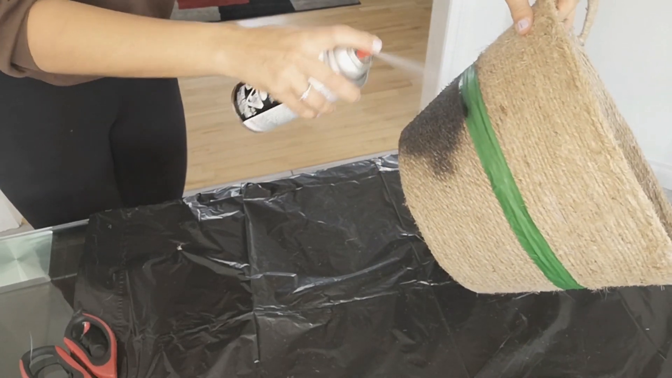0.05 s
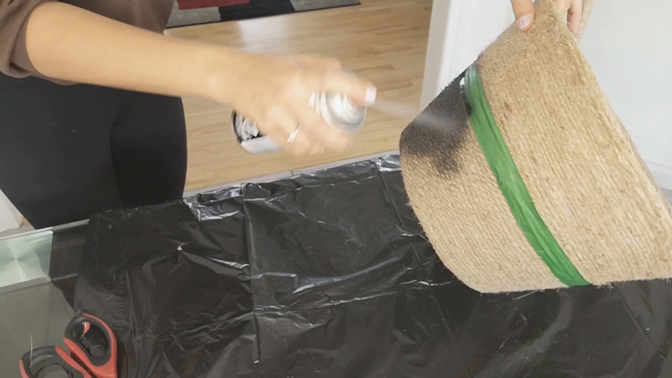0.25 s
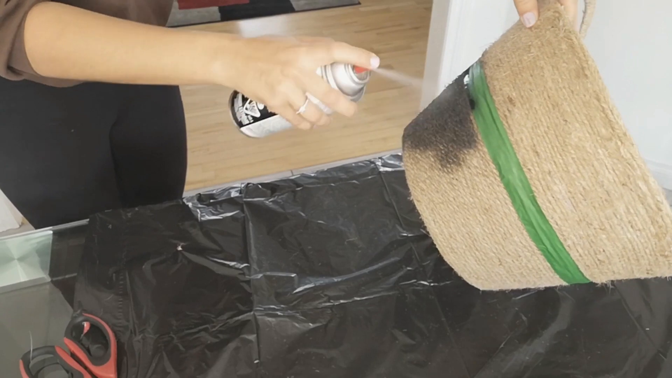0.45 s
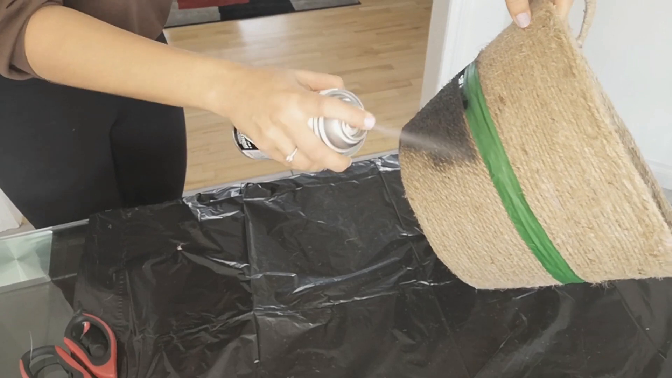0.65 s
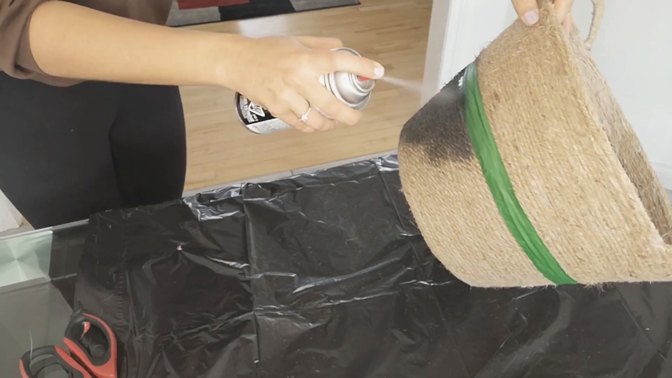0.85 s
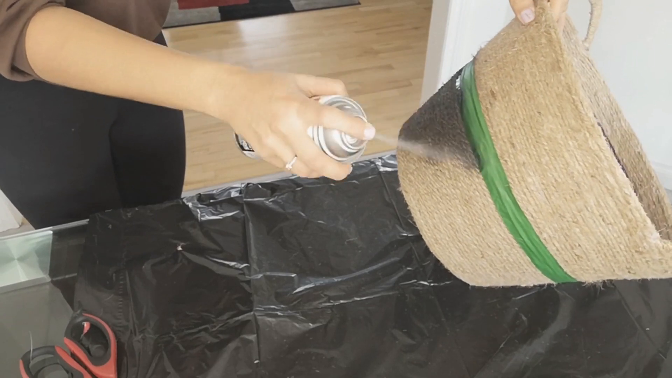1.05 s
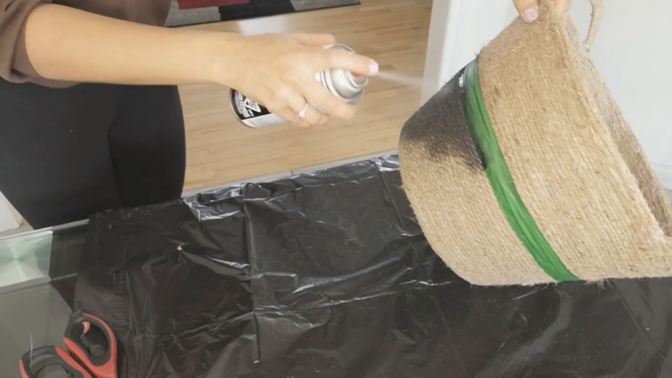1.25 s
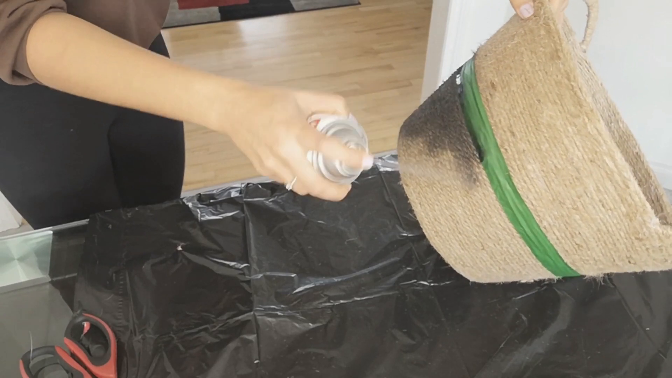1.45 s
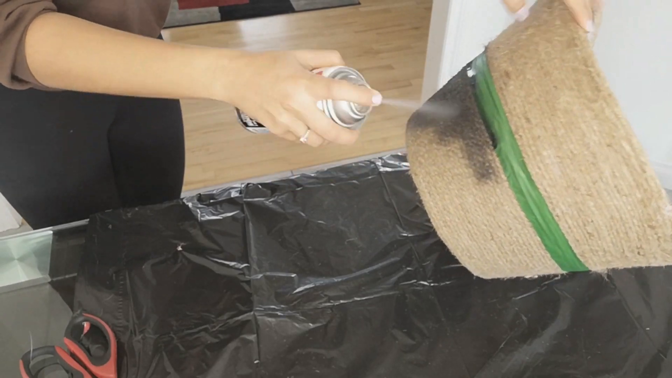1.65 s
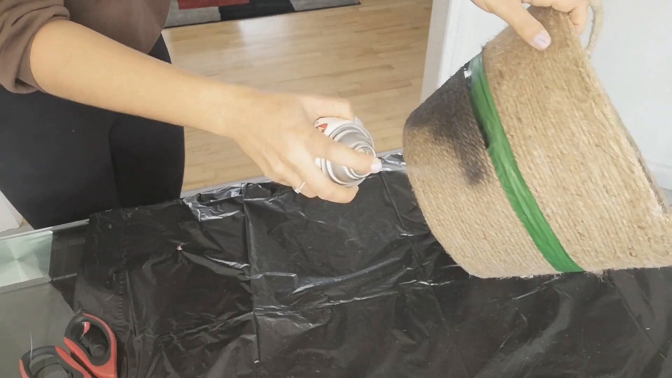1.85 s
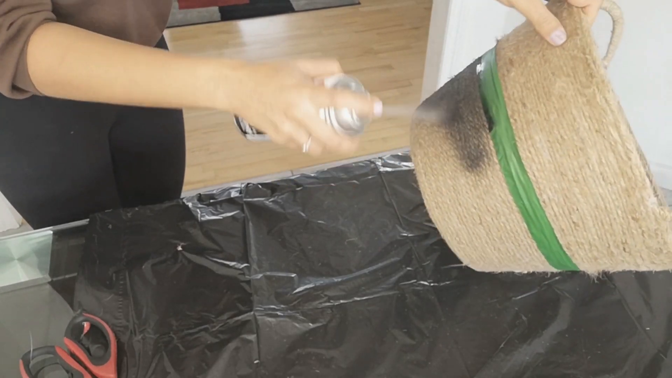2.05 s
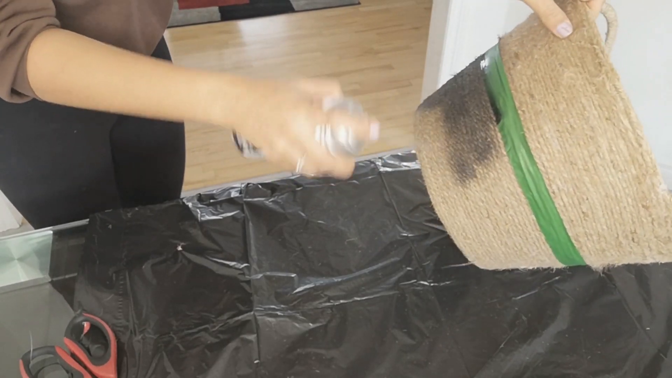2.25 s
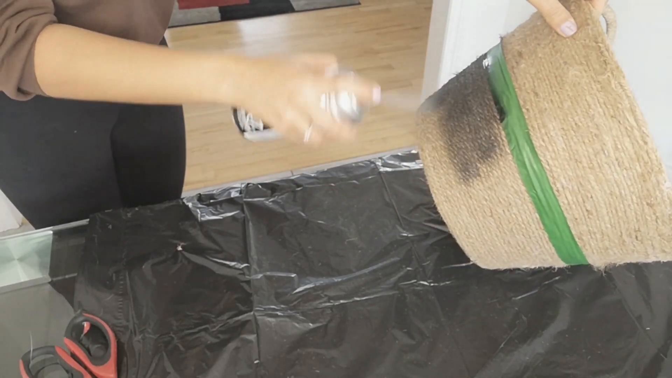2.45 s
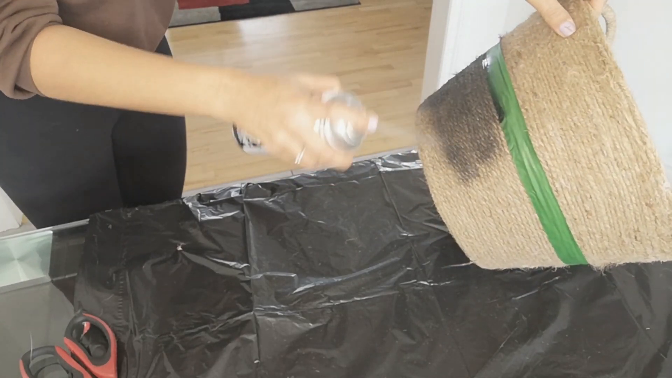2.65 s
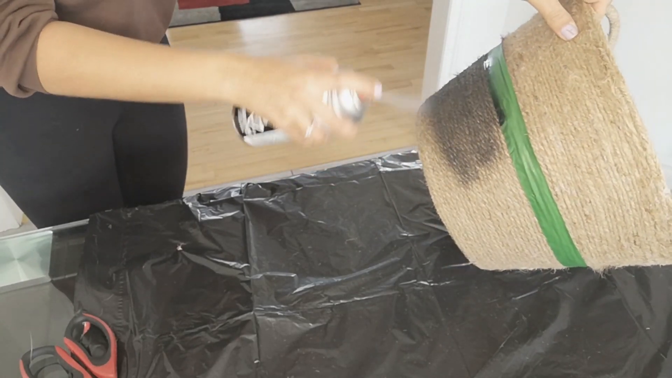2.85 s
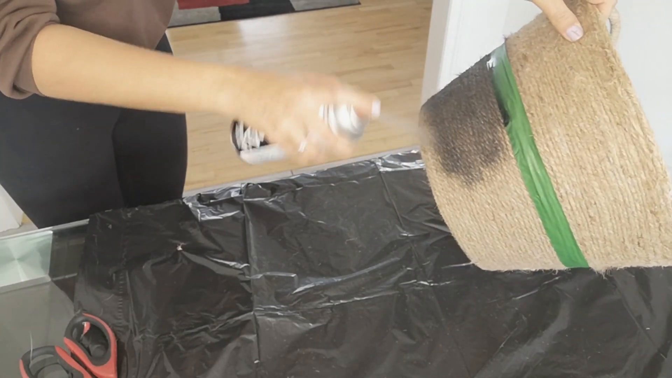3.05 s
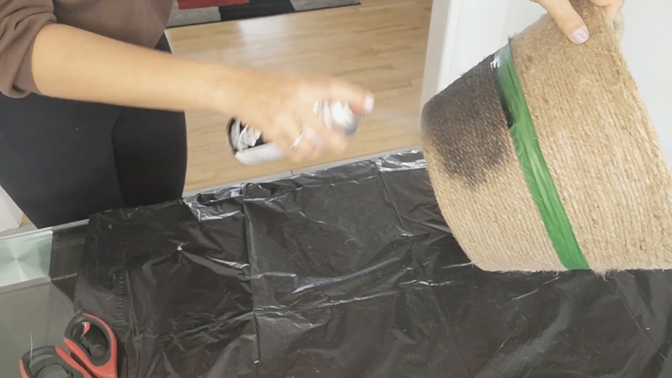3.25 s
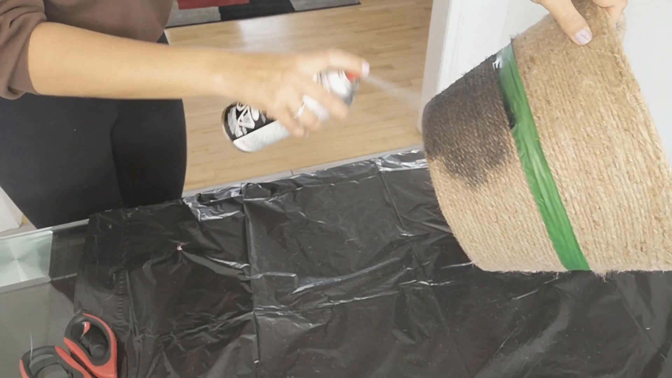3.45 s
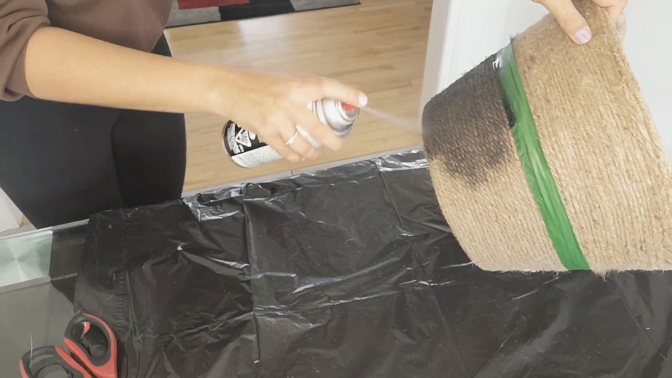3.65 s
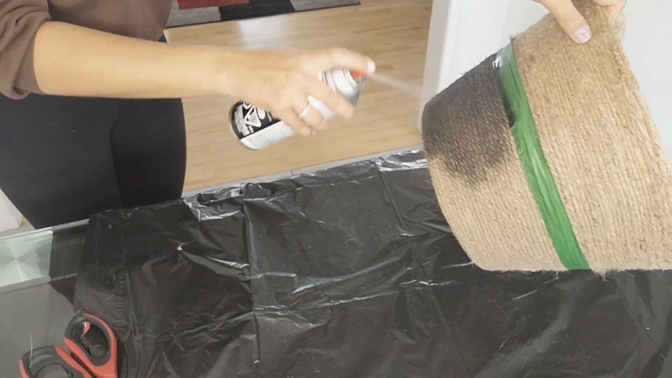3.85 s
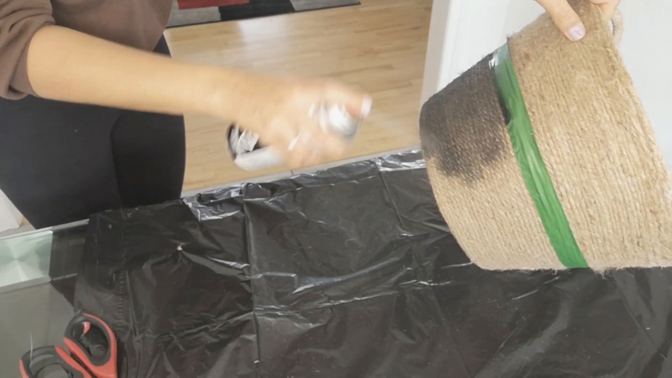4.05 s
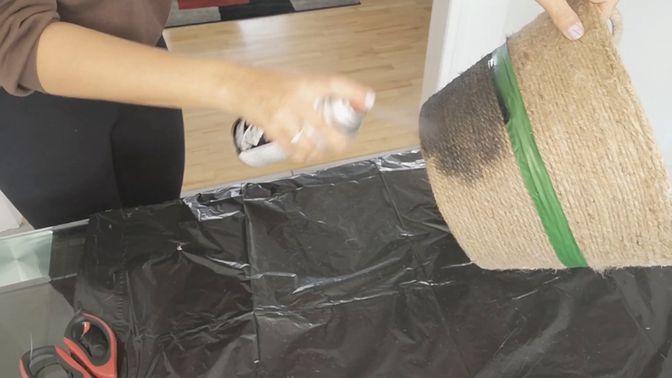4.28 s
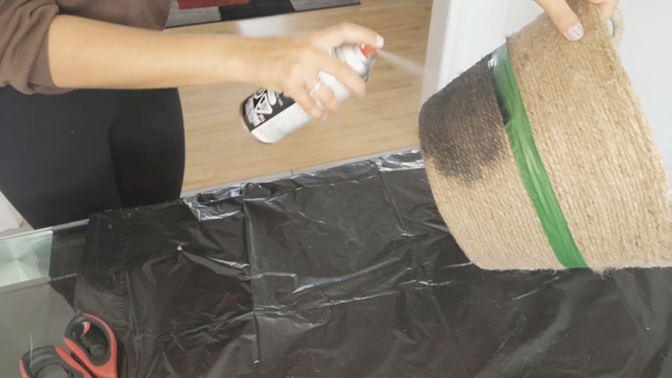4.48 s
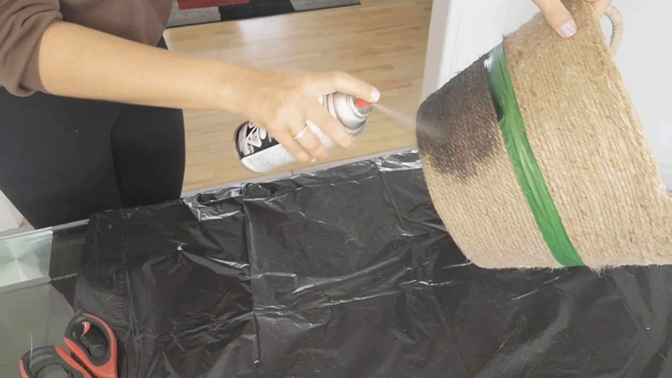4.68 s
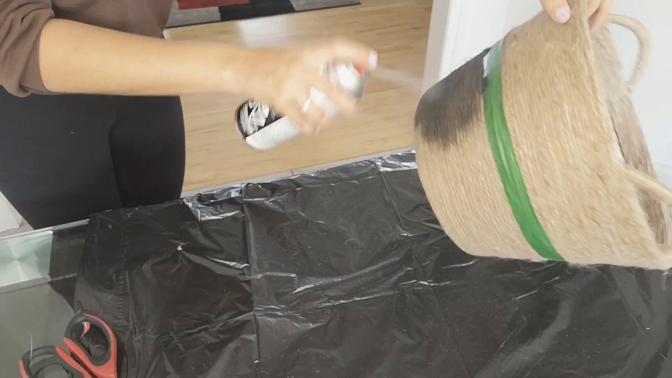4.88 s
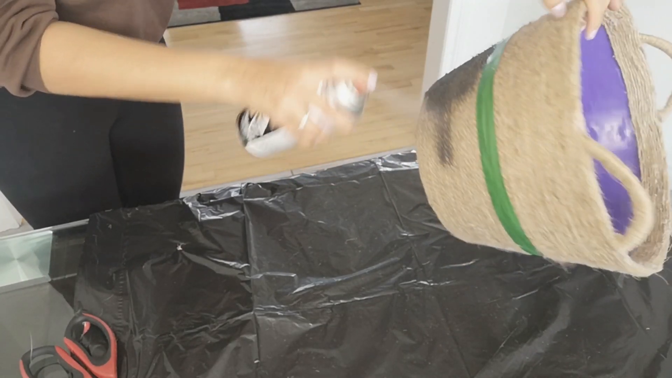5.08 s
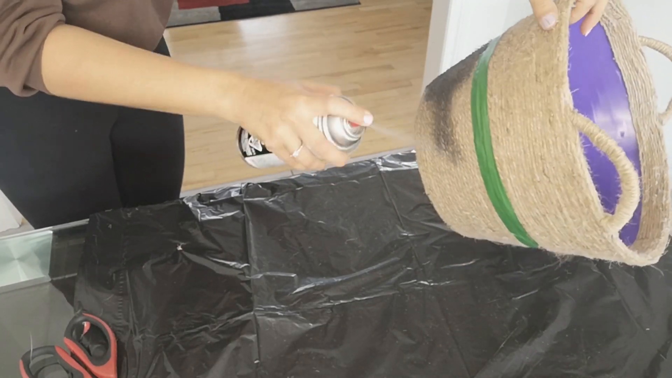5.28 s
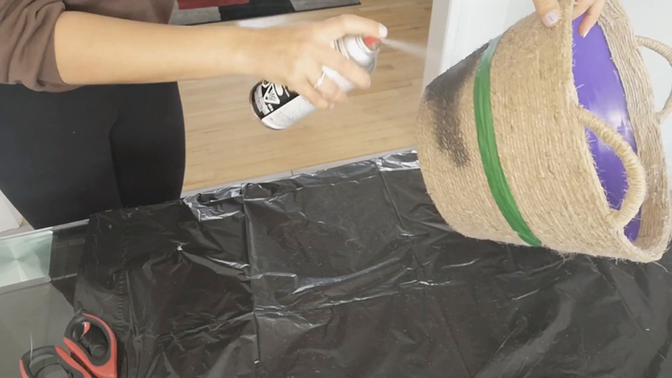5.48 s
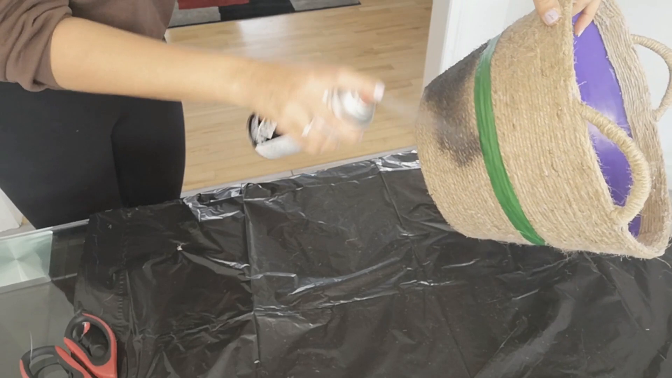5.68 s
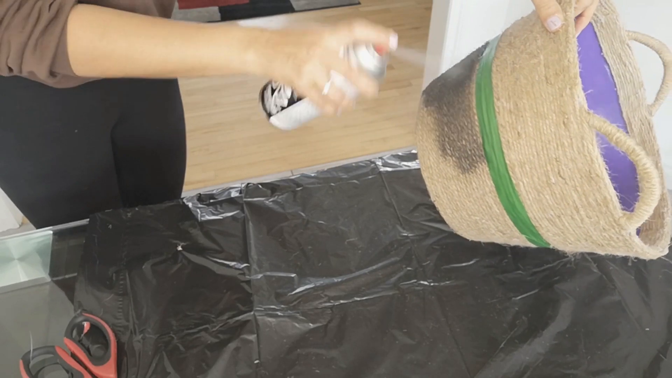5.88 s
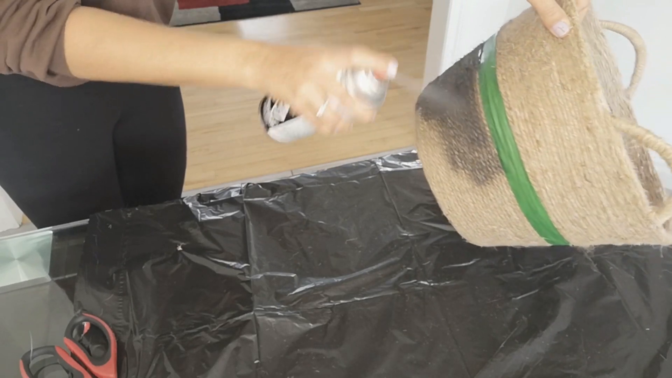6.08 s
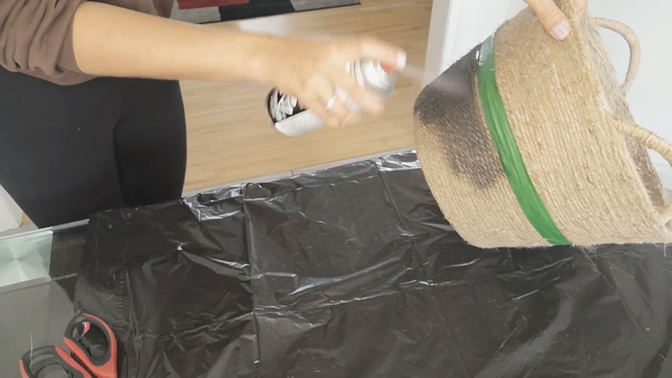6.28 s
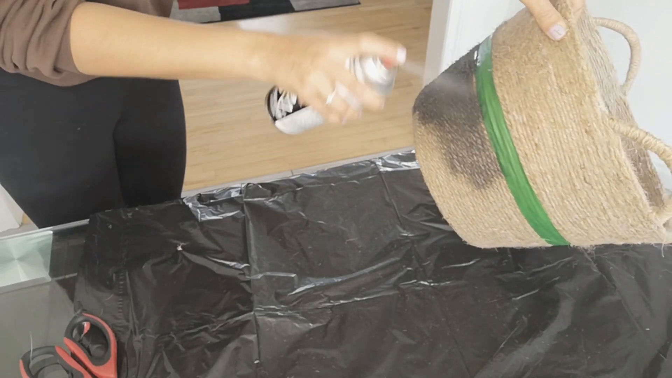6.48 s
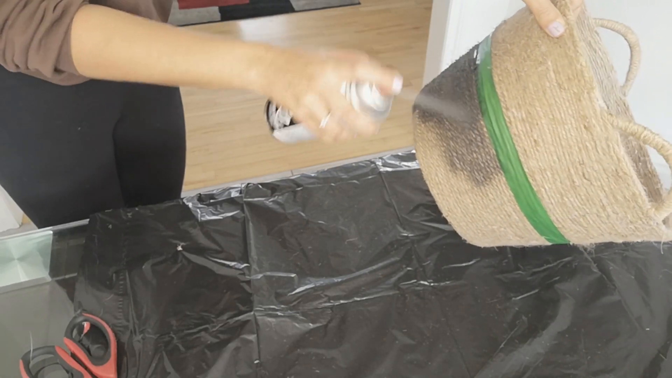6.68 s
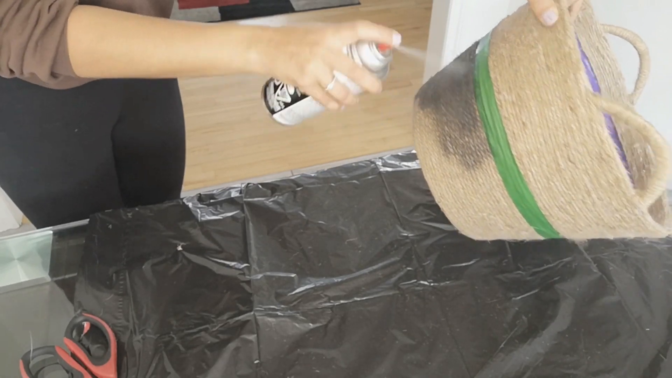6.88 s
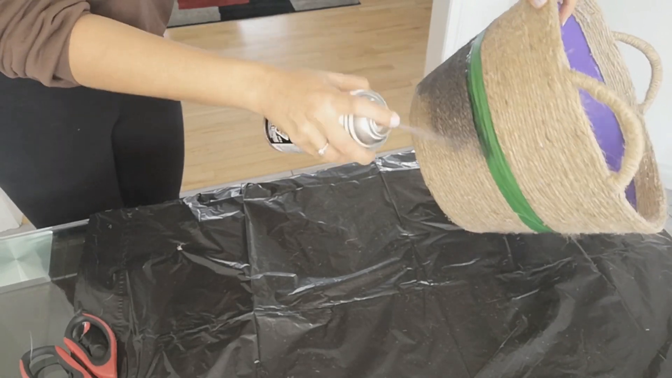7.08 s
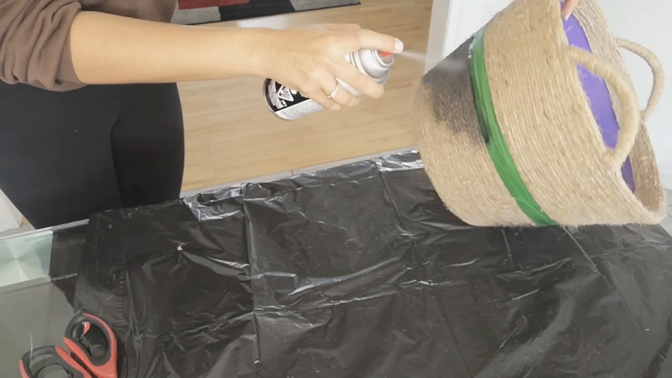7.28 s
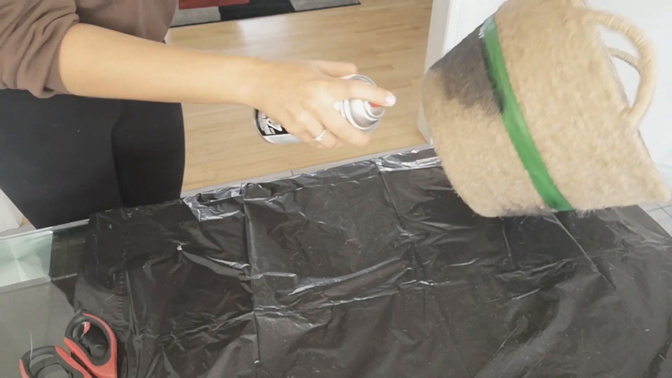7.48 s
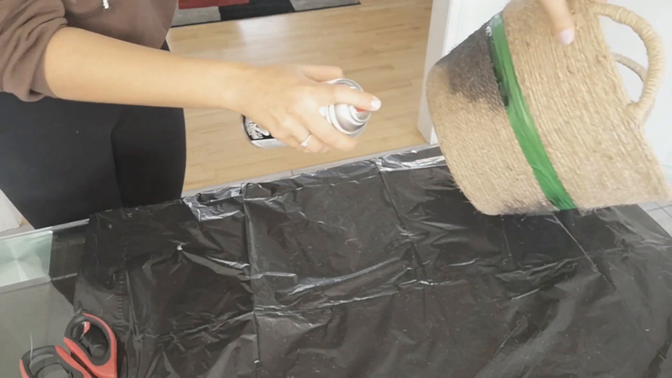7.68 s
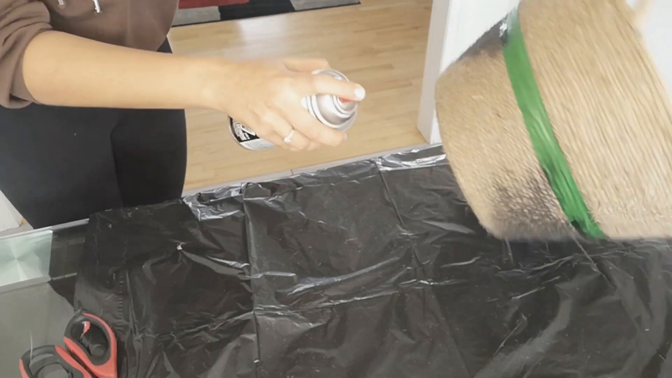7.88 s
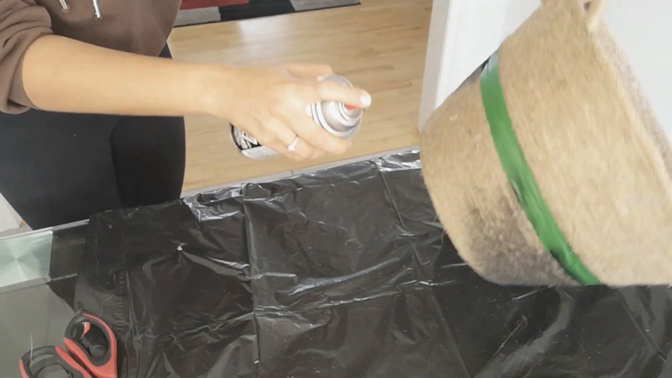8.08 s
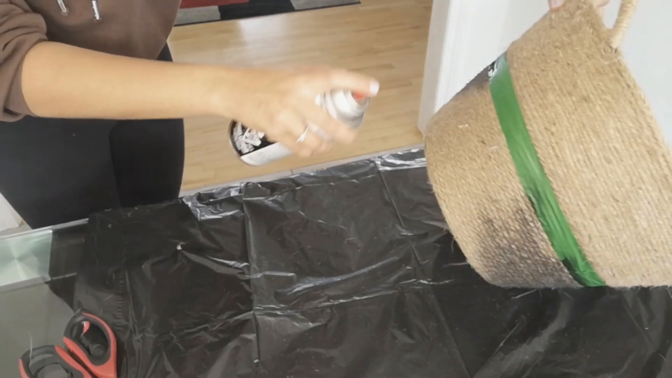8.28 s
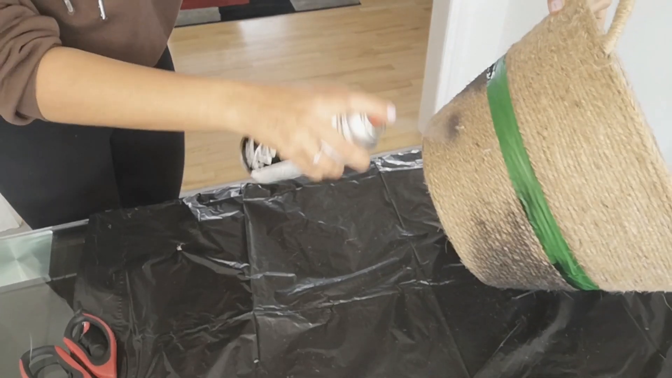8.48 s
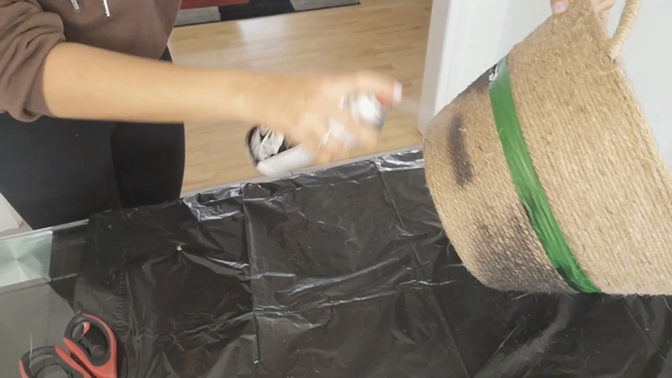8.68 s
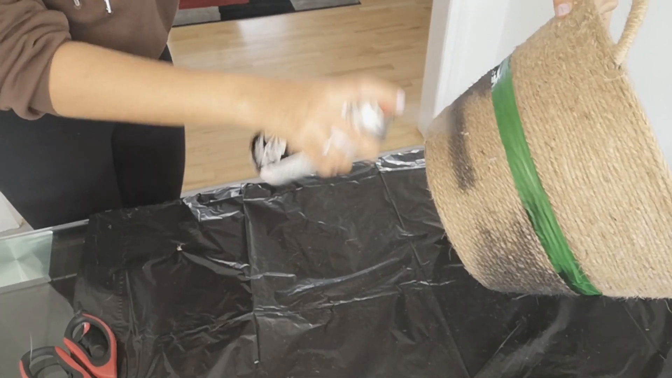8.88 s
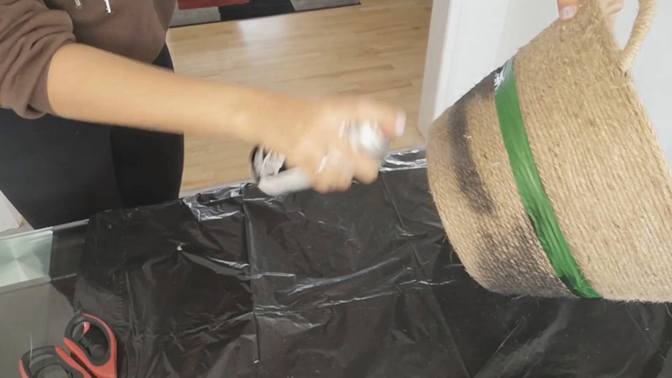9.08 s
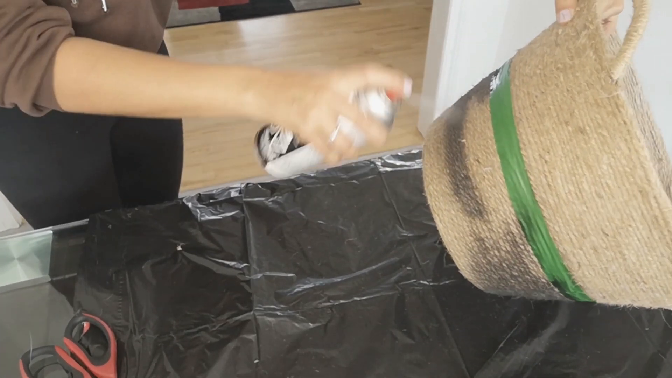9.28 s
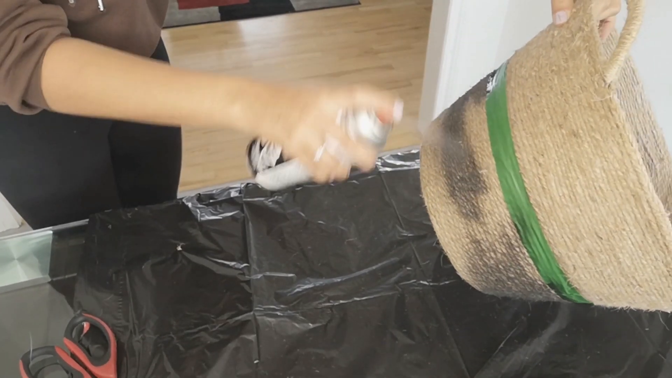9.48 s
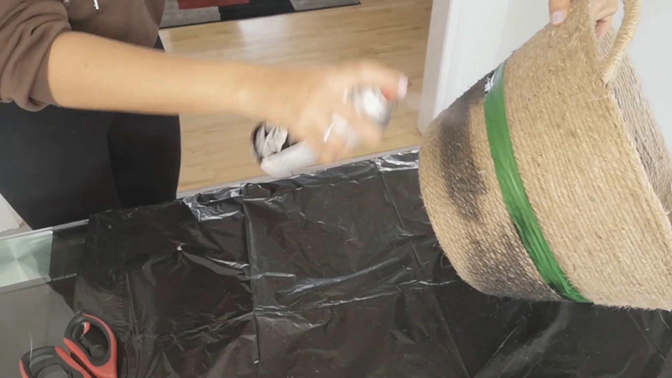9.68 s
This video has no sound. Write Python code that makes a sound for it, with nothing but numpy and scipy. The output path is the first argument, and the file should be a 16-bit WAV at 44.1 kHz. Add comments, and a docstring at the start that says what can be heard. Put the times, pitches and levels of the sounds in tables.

```python
"""Spray-painting a rope basket.

A spray can hisses in long passes over a rope basket on a wooden floor, close to a two-port microphone.
At each turn of the wrist the mixing ball strikes the can's wall, bounces and rolls. In a pause the
basket is turned and set down: rope scuffs a plastic sheet, the boards thump.
A small room answers over a faint appliance hum."""
import sys
import numpy as np
from scipy import signal
from scipy.fft import rfft, irfft, next_fast_len
from scipy.io import wavfile
from scipy.ndimage import uniform_filter1d

SR = 44100
rng = np.random.default_rng(int(sys.argv[2]) if len(sys.argv) > 2 else 0)


def to_wav(s):
    """Save 16-bit WAV."""
    ch = np.atleast_2d(s).T  # columns
    pcm = np.round(np.clip(ch, -1, 1) * 32767)  # PCM
    wavfile.write(sys.argv[1], SR, pcm.astype(np.int16))


N = 429093
HOP = 128
BIN_HZ, FRAMES = np.fft.rfftfreq(512, 1 / SR), N // HOP + 5
LEFT_LAG_S = 4 / SR

# jet spectrum: (frequency [Hz], density [dB])
JET_SPECTRUM = [(290, -63.5), (500, -29), (988, -20), (1030, -23), (1740, -6.5), (2330, -7), (2730, -7),
                (3250, -5.5), (4600, -4.5), (6420, -7), (7640, 1), (11300, -12.5), (14900, -18.5),
                (16000, -34)]
# the ports colour the jet differently: (frequency [Hz], left minus right [dB])
PORT_BALANCE = [(500, -9), (1200, 4.5), (1800, 7.5), (2700, -2), (4100, 6.5), (4900, 0), (5600, 0),
                (6300, 1), (7000, -3), (8000, -5), (9300, 5.5), (10500, 4), (15000, 1.5)]
# jet likeness between ports: (frequency [Hz], coherence [0-1])
PORT_COHERENCE = [(500, .5), (2000, .45), (5000, .5), (9000, .5), (15000, .42)]
# jet phase between ports: (frequency [Hz], left minus right [rad])
PORT_PHASE = [(500, -.3), (2000, -1.3), (4000, -2.6), (6000, -3.1), (9000, -3.2), (12000, -3.4),
              (15000, -3.8)]
# valve held down: (opens [s], closes [s])
VALVE_OPEN = [(0, 7.495), (8.523, 9.8)]
# hiss between passes, as the can nears and leaves the microphone: (time [s], relative level [dB])
STEADY_HISS = [(0, -60), (.85, -63.5), (1.2, -55), (2.9, -55.5), (4.5, -53.5), (6.3, -55), (7.3, -58),
               (8.5, -46.5), (9.1, -56), (9.73, -52.5)]
# jet crosses the rope: (centre [s], relative peak [dB], half length [s], lower hiss lift [dB])
JET_PASSES = [(0.254, -62, 0.088, 9), (0.648, -51.5, .07, 5), (0.962, -52, 0.077, 0),
              (1.104, -47, .05, -1.5), (1.252, -46.5, 0.045, 3), (1.61, -46, 0.069, 6.5),
              (1.941, -49.5, 0.078, 8), (2.074, -50, 0.11, -1), (2.417, -49.5, 0.075, 2),
              (2.702, -51.5, 0.063, 11), (2.851, -57.5, 0.022, 11), (3.08, -60.5, 0.071, 4),
              (3.313, -51.5, 0.097, 7.5), (3.753, -50.5, 0.055, 9.5), (3.962, -50.5, 0.064, 10),
              (4.297, -66, 0.081, 23), (4.56, -56, 0.089, 11), (4.752, -52.5, 0.048, 4.5),
              (4.994, -56, 0.092, 12), (5.38, -48.5, 0.096, -2), (5.678, -51.5, 0.046, 2),
              (6.073, -54, 0.057, -3), (6.197, -48.5, 0.035, -3), (6.41, -50.5, 0.055, 3),
              (6.802, -49, 0.058, 0), (7.077, -61, 0.067, 12), (7.373, -56, 0.038, 12),
              (7.477, -61, 0.061, 22), (8.577, -58, 0.068, -7), (8.68, -46, 0.068, -1),
              (9.34, -45.5, 0.1, 1.5), (9.502, -47.5, 0.09, -6.5), (9.72, -51, 0.076, 9)]
# still air: (frequency [Hz], density [dB])
AIR_SPECTRUM = [(8.8, -36), (15, 2), (48, 0.5), (70, -4.5), (92, -16), (123, -8), (150, -12),
                (269, -12.5), (303, -12.5), (382, -17.5), (417, -14.5), (575, -24), (1740, -21),
                (12700, -38.5), (16000, -52)]
# room tone common to both ports: (frequency [Hz], power share [0-1])
AIR_COHERENCE = [(20, 1), (150, 0.96), (350, 0.22), (1000, 0.12), (16000, .1)]
# appliance hum: (frequency [Hz], relative level [dB])
HUM_PARTIALS = [(118.4, -72.5), (188, -67.5), (296, -73.5), (355, -74.5), (415, -72), (473, -88)]
# air stirs at the ports, room tone swells: (time [s], rumble [dB], relative tone [dB])
AIR_LEVELS = [(0.0, -61, -75), (1.2, -60, -66.5), (2.8, -57.5, -66), (3.5, -55, -64), (4.9, -58, -66),
              (5.3, -54.5, -64), (7.43, -56, -70), (8.1, -64, -75), (8.4, -38, -66), (8.62, -55.5, -67),
              (8.92, -37, -68), (9.08, -56, -69), (9.73, -49, -63)]
# room decay: (frequency [Hz], t60 [s])
ROOM_DECAY = [(300, 0.94), (1000, 0.62), (2000, 0.39), (5000, 0.44), (10000, 0.46)]
# ball hits the wall; last four columns re the middle modes:
# (time [s], relative level [dB], middle-mode centre [Hz], low [dB], upper [dB], high [dB], tick [dB])
BALL_BLOWS = [(0.1652, -29, 1760, -12.5, 1.5, 2.5, -5), (0.222, -32, 2210, -7, -3, 4, -8),
              (0.2778, -31, 1970, -27, -13, -21, -18), (0.3084, -33, 1750, -32, -20, -29, -19),
              (0.5636, -24.5, 1850, -16, -9, 1.5, -11), (0.6005, -42, 1950, -9, -3, 3, -1),
              (0.636, -23, 2060, -18, -6, -5, -12), (0.724, -36.5, 1750, -32, -13, -19, -16),
              (0.9392, -22.5, 2100, -12.5, -7, 3.5, -10), (0.9941, -21.5, 1750, -31, -20, -18, -11),
              (1.0313, -20.5, 1790, -21, -8, -5, -10.5), (1.0869, -22, 1720, -34, -18, -10, -9),
              (1.1149, -25.5, 1710, -29, -18, -20, -10), (1.386, -16.5, 2060, -24, -5, -6, -10),
              (1.4576, -30, 1800, -14, -9, -10, -9), (1.515, -23, 2150, -21, -22.5, -8, -15),
              (1.5386, -26, 1870, -17, -13, -34.5, -4), (1.8446, -18, 1900, -12, -3.5, -2, 1.5),
              (1.92, -22, 1690, -21, -17, -25, -16), (1.951, -18, 1740, -17, -20, -23, -16),
              (2.176, -19, 1820, -17, -2.5, 0.5, -10), (2.2327, -18, 1740, -44.5, -26.5, -24, -18),
              (2.2742, -24, 1780, -34, -29, -27, -25), (2.2937, -33, 1790, -10, -22, -19, -21),
              (2.503, -24.5, 1760, -10.5, -12, -12, -21), (2.582, -14.5, 1860, -13, -6, -5, -6),
              (2.6836, -15.5, 1670, -22, -36, -16, -6), (2.7186, -16, 1760, -12, -15, -18, -16),
              (2.7379, -23.5, 1600, -18, -18, -20, -11), (2.8661, -35, 1670, -6.5, 2, -19, -17),
              (2.9267, -38.5, 1910, -3, -4, -17.5, -14), (2.9773, -19, 1700, -10.5, -0.5, 3.5, -3),
              (3.0968, -17, 1670, -8, -15, -8, -10.5), (3.1353, -23.5, 1790, -18, -6, -16, -11),
              (3.1716, -27.5, 1740, -11, -21, -25, -27), (3.2054, -32, 1660, -5, -11, -11, -8),
              (3.3082, -20, 1990, -10, -2.5, 3, -1), (3.4505, -13.5, 1820, -14, -6.5, -2, -5.5),
              (3.5271, -19.5, 1660, -11, -8, -10, -11.5), (3.5797, -26.5, 1720, -5.5, -11, -2, -12),
              (3.6073, -25, 1950, -5.5, -11, -21, -14), (3.6565, -21.5, 1960, -13.5, -5, -1, -2.5),
              (3.7971, -16, 1840, -22, -12, -8, -8), (3.8786, -29.5, 1830, -28, -10, -7, 5),
              (3.9187, -35, 2100, -6, -5, -11, -5), (3.932, -29, 2140, -10, 1, 0, -6),
              (3.9909, -22, 1920, -20.5, -22, 0, -8), (4.2478, -33.5, 2050, -14, 8, -3, -8),
              (4.306, -28, 1900, -13, -3, -13, -10), (4.4708, -22.5, 1690, -13, -1, -23, -5.5),
              (4.4976, -18.5, 1710, -25, -6.5, -31, -10), (4.6136, -26.5, 1910, -11, -8, -15, -18),
              (4.6625, -28.5, 1970, -10, -8, -19, -17), (4.8315, -13, 1950, -12, -8, -30, -4.5),
              (4.9357, -28, 1900, -17, -1, -17, -5), (5.01, -26.5, 1790, -9, -1, -17, -3),
              (5.1123, -17.5, 1720, -18.5, -10, -14, -9.5), (5.1488, -18.5, 1800, -21, -9, -10, -6),
              (5.2468, -22.5, 1990, -8.5, -7.5, -5, -8), (5.28, -27, 1710, -9, -5, -5, -7),
              (5.3138, -21, 2050, -32, -5, -20, -17), (5.445, -16.5, 1870, -17.5, -14, -22, -9),
              (5.5258, -27, 1930, -7, -11, -13, -6), (5.5602, -23, 1800, -9, -4.5, -6, -10),
              (5.7886, -12.5, 1720, -14.5, -6.5, -25, -8), (5.8529, -18.5, 1840, -13, -5, -26, -10.5),
              (5.877, -25.5, 1930, -20, -15, -18, -7), (5.9089, -21, 1660, -13, -2.5, -29, -11),
              (5.9353, -30.5, 2090, -12, -2, -15, 0.5), (5.9442, -21.5, 1800, -14, -9, -14, -12),
              (5.979, -28.5, 1760, -17, -8, -22, -10), (6.03, -42, 1940, -21, -5, 11, -4),
              (6.1441, -16, 1840, -18, -7.5, -18, -9), (6.1993, -18, 1700, -15, -4, -9, -7),
              (6.2119, -26, 1730, -14, -7, -1, -2), (6.2655, -36, 2020, -4, -14, -8, -11),
              (6.3056, -33.5, 1680, -11, 0, -10, -10), (6.333, -28, 1800, -14, -11, -10, -13),
              (6.5782, -37, 1730, -8, 3.5, 0, 0), (6.988, -30, 2020, -13.5, -1, 2, -0.5),
              (7.0442, -29, 1690, -13.5, -8, -7, -13), (7.3282, -34.5, 1980, -8, 3, 8.5, 2),
              (7.6509, -41.5, 1940, -11, 6, 10, -11), (7.676, -35.5, 1980, -12, 0, -7, -14),
              (8.8802, -33.5, 1730, -11, -18, -6, -6), (8.9215, -36, 1710, -7, -7, -13, -4),
              (8.932, -33.5, 1930, -14, -1, -12, -3), (8.9553, -32.5, 1790, -23, -3, -17, -8),
              (9.1235, -13, 1880, -16, -8, -10, 0.5), (9.21, -28.5, 2030, -10, 1, 2, -5),
              (9.2619, -21.5, 1640, -23, -14, -20, -14), (9.298, -20.5, 1930, -13.5, -22, -20, -15),
              (9.5104, -16, 1640, -25, -15, -18, -10), (9.5335, -19, 1675, -15, -6, -8, -1),
              (9.6565, -31, 1710, -14, -3, -14, 0), (9.6858, -30, 2150, -12, -5, -14, -4)]
# can wall: (frequency [Hz], level [dB], t60 [s], lasting share [0-1])
WALL_MODES = [(795.5, -9, 0.37, 0.7), (964, -3.5, 0.11, 0.5), (1059, 12, .06, 0.47),
              (1186, 12.5, 0.16, 0.24), (1444, -18.5, 0.24, 0.72), (1690, -0.5, 0.18, 0.15),
              (1760, 1.5, 0.048, 0.14), (1866, -1.5, 0.067, 0.08), (1930, -3.5, .14, 0.25),
              (2050, -1.5, 0.16, 0.3), (2150, -0.5, 0.13, 0), (2332, 0.5, .06, 0.3), (2637, 6.5, .04, 0),
              (2797, 5.5, .04, 0.2), (3094, 2, 0.045, 0.7), (3703, 10, 0.057, 0.4), (3910, 7, 0.043, 0),
              (4374, 8.5, .08, 0)]
# contact tick: (frequency [Hz], density [dB])
TICK_SPECTRUM = [(2500, -32), (4500, -4.5), (6300, -6.5), (7400, -1), (8800, -6), (10500, -20.5),
                 (15500, -51)]
# basket knocks the floor: (time [s], relative level [dB], mode tilt [dB/octave])
BASKET_KNOCKS = [(5.1, -32, -9), (5.15, -36, -8), (7.629, -35, 3), (7.681, -25, -10), (7.718, -37.5, 11),
                 (8.257, -13.5, 2.8), (8.289, -22, 2.5), (8.329, -29, 7), (8.369, -17.5, -0.5),
                 (8.428, -22.5, 1.5), (8.859, -56, 9)]
# floor boards: (frequency [Hz], level [dB], t60 [s])
BOARD_MODES = [(33, -8.5, 0.55), (50, -4, 0.15), (62.1, 4, 0.56), (76, 4, 0.22), (91, 8.5, 0.13),
               (143, -10, 0.29), (225, -14, 0.1)]
# rope scuffs the sheet: (time [s], peak [dB], decay [s])
ROPE_SCUFFS = [(7.537, -46, 0.018), (7.6513, -28.5, 0.014), (7.695, -30, 0.014), (8.2553, -26, 0.008),
               (8.288, -37.5, 0.065)]
# rope on plastic: (frequency [Hz], density [dB])
SCUFF_SPECTRUM = [(400, -13), (1060, -11), (1950, -1), (2650, -5.5), (4400, -14), (6200, -20),
                  (7800, -13.5), (10000, -22.5), (15000, -52)]


def amp(db):
    return 10 ** (np.asarray(db) / 20)


def unit_rms(x):
    return x / np.sqrt(np.mean(x ** 2) + 1e-20)


def curve_at(points, hz):
    knots_hz, values = np.transpose(points)
    return np.interp(np.log(hz + 1), np.log(knots_hz + 1), values)


def add(mix, start_s, sound):
    part = mix[..., round(start_s * SR):][..., :sound.shape[-1]]
    part += sound[..., :part.shape[-1]]


def coloured(x, spectrum_db):
    size = next_fast_len(x.shape[-1])
    gain = amp(curve_at(spectrum_db, np.fft.rfftfreq(size, 1 / SR)))
    return irfft(rfft(x, size) * gain, size)[..., :x.shape[-1]]


def pan(balance_db):
    return amp(np.array([balance_db / 2, -balance_db / 2]))


def wander(span_s):
    """Smooth random drift, one value a frame."""
    return unit_rms(uniform_filter1d(rng.standard_normal(FRAMES), round(span_s * SR / HOP)))


def port_noise(field_db):
    """Noise from a level field (ports x bins x frames); the ports are partly alike, offset in phase."""
    a, b, c, d = rng.standard_normal((FRAMES, len(BIN_HZ), 4)).T
    right, unshared = a + 1j * b, c + 1j * d
    coherence = curve_at(PORT_COHERENCE, BIN_HZ)[:, None]
    shift = np.exp(1j * curve_at(PORT_PHASE, BIN_HZ))[:, None]
    left = coherence * right * shift + np.sqrt(1 - coherence ** 2) * unshared
    return signal.istft(np.array([left, right]) * amp(field_db), nperseg=512, noverlap=512 - HOP)[1][:, :N]


def spray_jet():
    """Turbulent hiss with drifting patches and sputter; splash on the rope lifts its lower half."""
    frame_s, hz = np.arange(FRAMES) * HOP / SR, BIN_HZ[:, None]
    centre_s, peak_db, half_s, lift_db = np.transpose(JET_PASSES)[:, :, None]
    swells = amp(peak_db) * np.exp(-((frame_s - centre_s) / half_s) ** 2)
    steady = amp(np.interp(frame_s, *np.transpose(STEADY_HISS)))
    level = steady + swells.sum(0)
    splash_db = (0.5 * steady + (swells * lift_db).sum(0)) / level / (1 + (hz / 5500) ** 4)
    patches = uniform_filter1d(rng.standard_normal((FRAMES, len(BIN_HZ))).T, 8, axis=0)
    patches_db = 2.84 * unit_rms(uniform_filter1d(patches, 20, axis=1))
    sputter_db = 2.06 * wander(span_s=0.009)
    # the highest hiss swells less with a pass
    top_db = 0.35 * 20 * np.log10(steady / level) / (1 + (11000 / (hz + 1)) ** 8)
    nozzle_hz = 5370 + 150 * wander(span_s=0.166)  # a peak moves as the nozzle turns
    nozzle_db = 3.2 * (1.5 - steady / level) * np.exp(-((hz - nozzle_hz) / 450) ** 2)
    base_db = curve_at(JET_SPECTRUM, hz)
    base_rms = np.sqrt(np.mean(amp(base_db) ** 2))
    field_db = base_db + splash_db + top_db + nozzle_db + patches_db + sputter_db
    ports = pan(curve_at(PORT_BALANCE, hz) - 3 + 1.5 * wander(span_s=0.166))
    t = np.arange(N) / SR
    held = sum((t >= open_s) * (t <= close_s) * 1. for open_s, close_s in VALVE_OPEN)
    valve = uniform_filter1d(held, size=300)
    return amp(-11) * valve * port_noise(field_db + 20 * np.log10(ports * level / base_rms))


def room_tone():
    """Swelling air noise, a wavering appliance hum and the rumble of air at the ports."""
    t, size = np.arange(N) / SR, next_fast_len(N)
    hz = np.fft.rfftfreq(size, 1 / SR)
    spectra = rfft(rng.standard_normal((3, N)), size)
    shared = curve_at(AIR_COHERENCE, hz)
    stereo = np.sqrt(shared) * spectra[0] + np.sqrt(1 - shared) * spectra[1:]
    air = irfft(stereo * amp(curve_at(AIR_SPECTRUM, hz)), size)[:, :N]
    wavers = unit_rms(uniform_filter1d(rng.standard_normal((len(HUM_PARTIALS), N)), 4000, axis=1))
    hum = sum(amp(db + 2 + 3.64 * waver) * np.sin(2 * np.pi * (hum_hz * t + 0.14 * waver))
              for (hum_hz, db), waver in zip(HUM_PARTIALS, wavers))
    rumble = coloured(rng.standard_normal(N), [(8, -13), (18, -13), (42, -15.5), (70, -36.5), (200, -84)])
    times_s, *levels_db = np.transpose(AIR_LEVELS)
    rumble_db, tone_db = (np.interp(t, times_s, column) for column in levels_db)
    swell = (amp(tone_db - tone_db.min()) - 1) * coloured(air, [(400, -5.5), (900, -8)])
    return amp(-58.5) * (air + swell) / air.std() + hum + amp(rumble_db) * unit_rms(rumble)


def room_reverb(x):
    """Sparse reflections, each band dying at its own rate; three tails cross-fade for a smooth decay."""
    taps = np.zeros((3, 2, SR // 2))
    slots = np.arange(200, SR // 2 - 20, 20)
    arrivals = slots + rng.integers(0, 20, (3, 2, len(slots)))
    np.put_along_axis(taps, arrivals, rng.choice([-1., 1.], arrivals.shape), axis=2)
    hz, t, spectra = signal.stft(taps, SR, nperseg=256)
    decay = amp(-60 * t / curve_at(ROOM_DECAY, hz)[:, None])
    tails = signal.istft(spectra * decay, SR, nperseg=256)[1]
    fade_rad = 2 * np.pi * (1.3 * np.arange(N) / SR + np.arange(3)[:, None, None] / 3)
    feeds = np.sqrt(2 / 3) * np.cos(fade_rad) * x
    return signal.fftconvolve(feeds, tails / np.linalg.norm(tails[0, 0]), axes=2).sum(0)[:, :N]


def can_wall(weights, phases_rad, t, thud_s, tuning=1):
    """Wall modes: paint soaks up most of a ring within a few ms, a share lasts."""
    hz, db, t60_s, lasting = np.transpose(WALL_MODES)[:, :, None]
    decay = (1 - lasting) * np.exp(-(t / thud_s) ** 2) + lasting * amp(-60 * t / t60_s)
    rise = np.minimum(t * hz / 0.85, 1)  # about one cycle
    modes = np.sin(2 * np.pi * hz * tuning * t + phases_rad[:, None])
    return (weights[:, None] * amp(db) * decay * rise * modes).sum(0)


def ball_blows():
    """Each blow rings the wall's mode groups by where it lands, and ticks in the treble."""
    out, t = np.zeros((2, N)), np.arange(4500) / SR
    crest, tick_samples = 1.75, 2500
    hz, mode_db = np.transpose(WALL_MODES)[:2]
    group = np.searchsorted([1400, 2450, 3400], hz)  # low, middle, upper, high
    scatter = rng.standard_normal((len(BALL_BLOWS), 4, len(hz)))
    noises = rng.standard_normal((len(BALL_BLOWS), 2, tick_samples))
    tick_decay = (np.exp(-(t / 0.004) ** 2) + 0.25 * amp(-60 * t / 0.06))[:tick_samples]
    for blow, (spot, phase, slosh, jitter), noise in zip(BALL_BLOWS, scatter, noises):
        start_s, db, centre_hz, low_db, upper_db, high_db, tick_db = blow
        group_gains = amp([low_db, 0, upper_db, high_db])
        weights = amp(2.13 * spot) * np.where(group == 1, amp(-60 * np.log2(hz / centre_hz) ** 2), 1)
        group_rms = np.sqrt(np.bincount(group, (weights * amp(mode_db)) ** 2) / 2)
        weights *= (group_gains / group_rms)[group]
        tuning = 1 + 0.014 * slosh[:, None]  # sloshing paint detunes the modes
        thud_s = 0.0045 * np.exp(0.084 * jitter[0])
        ring = np.array([can_wall(weights, 1.84 * phase - 2 * np.pi * hz * lag_s, t, thud_s, tuning)
                         for lag_s in (LEFT_LAG_S, 0)])
        ring *= crest * np.linalg.norm(group_gains) / abs(ring).max()
        tick = coloured((noise[0] + 0.77 * noise) * tick_decay, TICK_SPECTRUM)
        ring[:, :tick_samples] += crest * amp(tick_db) * pan(-7)[:, None] * tick / abs(tick).max()
        add(out, start_s, amp(db) * pan(4 * jitter[1])[:, None] * ring)
    highpass = signal.butter(6, 700, "high", fs=SR, output="sos")  # thin clinks, no low thud at onset
    return signal.sosfilt(highpass, out)


def ball_rolling():
    """After each blow the ball chatters in the paint: tiny uneven knocks ring the middle modes."""
    knocks_per_s, rise_s, fade_s = 400, 0.0066, 0.055
    sizes = amp(4.5 * np.minimum(rng.exponential(1, N), 3))
    knocks = sizes * (rng.random(N) < knocks_per_s / SR) * rng.choice([-1, 1], N)
    t, hz = np.arange(SR) / SR, np.transpose(WALL_MODES)[0]
    weights = amp(-90 * np.log2(hz / 1880) ** 2)
    body = can_wall(weights, rng.uniform(0, 2 * np.pi, len(hz)), t[:4000], thud_s=0.0069)
    power, envelope = np.zeros(N), (1 - np.exp(-t / rise_s)) * np.exp(-t / fade_s)
    for start_s, db, *_ in BALL_BLOWS:
        add(power, start_s, amp(db - 19) ** 2 * envelope)
    ring = unit_rms(signal.oaconvolve(knocks, body)[:N]) * np.sqrt(power)
    return pan(1)[:, None] * np.array([np.roll(ring, round(LEFT_LAG_S * SR)), ring])


def floor_thumps():
    """The basket's soft push rings the boards; both ports hear it nearly alike."""
    out, t = np.zeros(N), np.arange(SR // 2) / SR
    rise = np.minimum(t / 0.017, 1)
    for start_s, db, tilt_db_per_octave in BASKET_KNOCKS:
        ring = sum(amp(mode_db + tilt_db_per_octave * np.log2(hz / 60) - 60 * t / t60_s)
                   * np.sin(2 * np.pi * hz * t) for hz, mode_db, t60_s in BOARD_MODES)
        add(out, start_s, -amp(db - 9) * ring * rise)
    return pan(-0.77)[:, None] * out


def rope_scuffs():
    """Rope rubs the plastic sheet in short, scratchy noise bursts."""
    out, t = np.zeros((2, N)), np.arange(8000) / SR
    attack = (1 + 2.8 * np.exp(-t / 0.0017)) * np.minimum(t / 0.00042, 1)
    for start_s, peak_db, decay_s in ROPE_SCUFFS:
        noise = rng.standard_normal((2, len(t)))
        burst = coloured(noise[0] + 4.3 * noise, SCUFF_SPECTRUM) * attack * np.exp(-t / decay_s)
        add(out, start_s, amp(peak_db) * burst / abs(burst).max())
    return out


def scene():
    """Jet, ball and scuffs with their reverb; thumps and room tone stay dry."""
    hiss, ball, scuffs = spray_jet(), ball_blows() + ball_rolling(), rope_scuffs()
    reverb = room_reverb(amp(-7) * hiss + amp(-6) * ball + amp(3.5) * scuffs)
    return hiss + ball + scuffs + reverb + floor_thumps() + room_tone()


def record(dry):
    """Steep low-pass band limit."""
    edge_hz = 15250
    lowpass = signal.firwin(511, edge_hz, window=("kaiser", 9), fs=SR)
    return signal.oaconvolve(dry, lowpass[None], "same")


dry = scene()
out = record(dry)
to_wav(out)
```